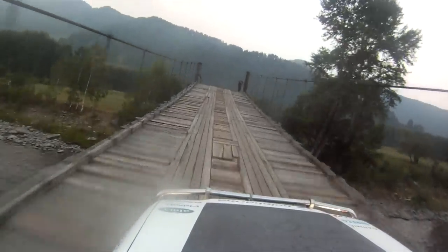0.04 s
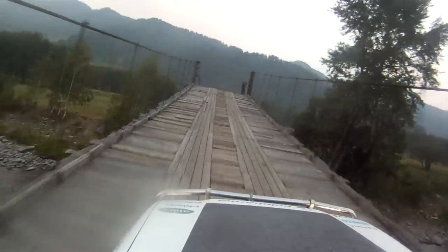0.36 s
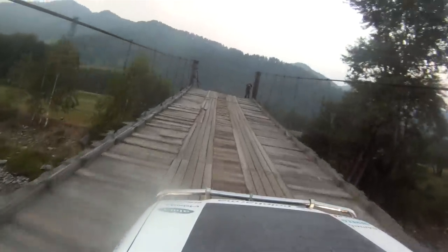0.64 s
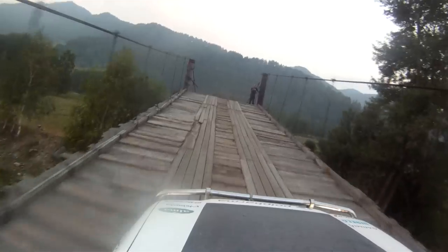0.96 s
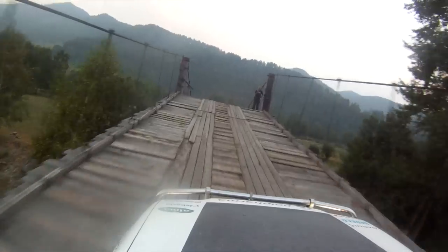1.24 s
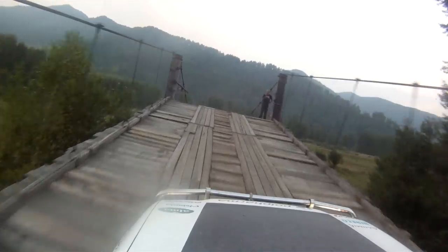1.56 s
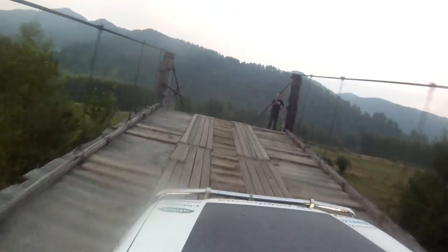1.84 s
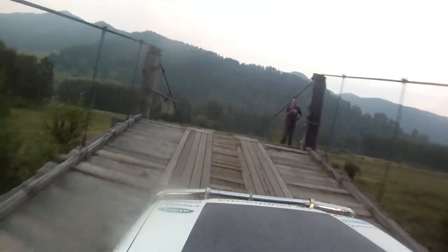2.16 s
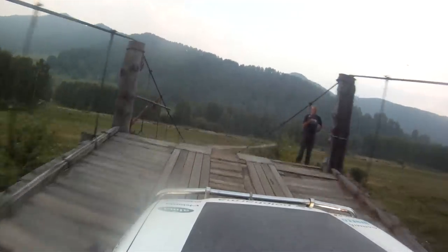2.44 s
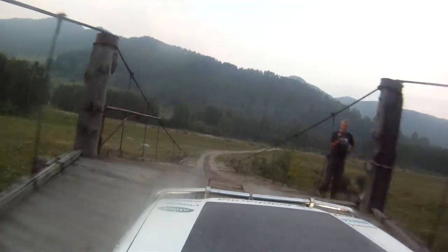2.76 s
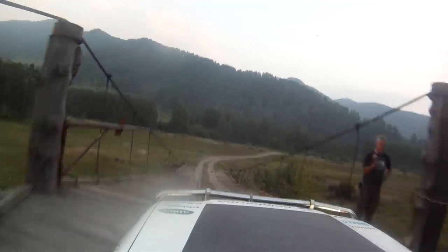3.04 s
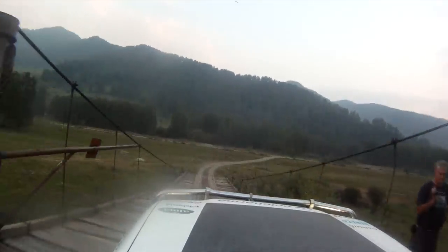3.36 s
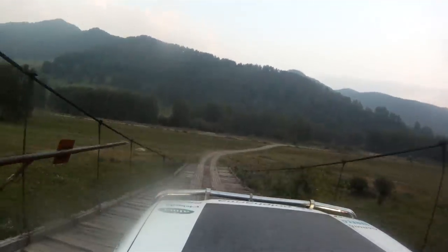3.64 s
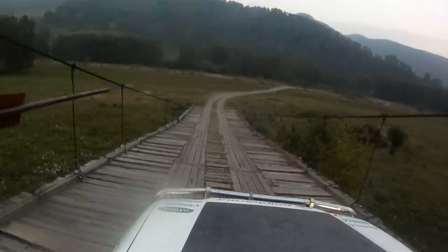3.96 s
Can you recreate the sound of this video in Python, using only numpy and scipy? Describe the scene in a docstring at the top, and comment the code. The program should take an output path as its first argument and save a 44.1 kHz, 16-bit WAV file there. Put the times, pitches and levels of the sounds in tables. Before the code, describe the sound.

A rushing river fades behind a rumbling car, then bridge planks knock and metal rattles.

```python
"""A rushing river fades and dulls while a car booms and rumbles, then planks knock and metal rattles.
An off-road car is rolling over the last planks of a wooden suspension bridge, leaving the water behind.
Its tyres roll on the boards, the uneven deck shakes its body, its engine drones and fittings squeak.
Two thin, sharp clicks come just before the rattles. We listen from a camera in a hard case on a swaying
pole above the roof; the water, tyres, knocks and rattles ring in that case."""
import sys
import numpy as np
from scipy import signal
from scipy.fft import rfft, irfft
from scipy.io import wavfile
from scipy.ndimage import uniform_filter1d

SR = 44100
rng = np.random.default_rng(int(sys.argv[2]) if len(sys.argv) > 2 else 0)


def put_to_file(sound):
    """Save the sound as 16-bit audio at rate SR, in the file named by the first command-line argument."""
    columns = np.atleast_2d(sound).T  # one column per channel
    safe = np.clip(columns, -1, 1)
    whole_steps = np.round(safe * 32767)
    wavfile.write(sys.argv[1], SR, whole_steps.astype(np.int16))


N = 176400
T = np.arange(N) / SR
FREQS = np.maximum(np.arange(N // 2 + 1) * SR / N, 1)
OCTAVES = np.log2(np.maximum(FREQS, 300) / 1000)  # counted from 1 kHz

# the river falling behind: t/s, level/dB, dullness/(dB per octave above 500 Hz)
RIVER_FADE = [(0, -31, 0.5), (.3, -31, -0.5), (.6, -31, 0.3), (.85, -32.5, 0.3), (1.15, -33, -0.05),
              (1.5, -35, 0), (1.85, -37, 0.1), (2.12, -41, 0.55), (2.4, -43.5, 0.5), (2.7, -48.5, 1),
              (3.05, -61.5, -1), (3.45, -64.5, 1.5), (4, -56.5, 1.5)]
# how strongly the car body booms: t/s, level/dB
BOOM_LEVEL = [(0, -26.5), (.1, -24.5), (.25, -29.5), (.45, -27), (.66, -33.5), (.78, -28), (1.1, -29.5),
              (1.38, -31), (1.75, -29), (2.0, -31), (2.35, -36.5), (2.6, -30.5), (2.7, -36.5), (2.8, -26),
              (3.05, -39), (3.25, -28), (3.5, -34), (3.62, -30), (3.82, -38.5), (4, -35)]


def river():
    """Splashes and bubbles make a flickering rush that fades and dulls with distance."""
    # tone colour of the water: f/Hz, level/dB
    water_colour = [(100, -15.5), (300, -5.5), (450, -1.5), (750, -5), (1200, 0.5), (1750, -1.5), (2850, 0),
                    (3300, -2.5), (4250, -14), (6000, -27.5), (7700, -16), (10300, -16), (11500, -36.5),
                    (12600, -33), (15000, -17.5)]
    splash_db, bubble_db, flicker_db = 0.87, -12.5, 0.78
    splashes = unit(rng.standard_normal(N) * undb(splash_db * wander(260)))
    water = unit(splashes + undb(bubble_db) * bubbles())
    spectrum = rfft(in_case(water, water_colour))
    dullness = curve(RIVER_FADE, column=2)
    rush = 0
    for octave in np.arange(-2, 4.5, .5):  # each band flickers on its own
        band = irfft(spectrum * np.maximum(1 - 2 * abs(OCTAVES - octave), 0), N)
        rush += band * undb(flicker_db * wander(11) - dullness * (octave + 1))
    return rush * undb(curve(RIVER_FADE))


def bubbles():
    """Each bubble rings with a short rising ping; higher ones die sooner."""
    per_second, cycles, spread_db = 1500, 16.5, 2.5
    out = np.zeros(N + SR)
    for when, pitch, softness, phase in rng.random((int(per_second * N / SR), 4)):
        hz = 700 * 16 ** pitch
        life = cycles / hz
        t = np.arange(int(2 * life * SR)) / SR
        turns = hz * t * (1 + 0.032 * t / life) + phase
        ping = np.sin(2 * np.pi * turns) * np.exp(-2 * t / life)
        start = int(when * N)
        out[start:start + len(t)] += ping * hz * undb(-spread_db * np.log(max(softness, .01)))
    return unit(out[:N])


def river_whistle():
    """A narrow band of the rush whistles and sinks in pitch as the river slips behind."""
    # path of the whistle: t/s, f/Hz, level/dB relative to the river
    glide = [(.3, 2955, -13.5), (.9, 2724, -28), (1.12, 2662, -7), (1.25, 2500, -8.5), (1.85, 2214, -4),
             (2.3, 2094, -8.5)]
    return wavering_tone(curve(glide), width_hz=170) * undb(curve(glide, column=2) + curve(RIVER_FADE))


def car_body():
    """The uneven deck shakes the body's low notes into a boom; dropping wheels thump them."""
    # notes the body rings at: f/Hz, width/Hz, level/dB
    notes = [(35, 33.6, 2.5), (70, 11.6, 0), (100.9, 20, 0), (118, 19.7, 1.5), (185.3, 19.3, -7),
             (207, 20.5, -11.5), (247, 15, -17.5)]
    # wheel drops: t/s, peak/dB
    drops = [(0.418, -20.5), (0.61, -25.5), (1.708, -20.5), (1.884, -21), (2.748, -21), (2.795, -18.5),
             (3.155, -24), (3.577, -23)]
    power = sum(undb(db) ** 2 / (1 + ((FREQS - hz) / width * 2) ** 2) ** 1.257 for hz, width, db in notes)
    shake = irfft(rfft(rng.standard_normal(N)) * np.sqrt(power), N)
    roughness = undb(1.5 * wander(50))
    boom = unit(even_out(shake, samples=SR // 8) * roughness) * undb(curve(BOOM_LEVEL))
    return boom + ring(drops, notes, swell_s=0.0097)


def planks():
    """Loose planks knock against the deck; a square hit makes one ring."""
    # knocks: t/s, level/dB, rise/s, decay/s, brightness/(dB per octave)
    knocks = [(2.15, -38.5, 0.01, 0.056, -1), (2.463, -28, 0.0049, 0.016, -0.5),
              (2.557, -35.5, 0.0088, 0.012, 0.5), (2.739, -34, 0.0057, 0.024, 0),
              (2.766, -31.5, 0.008, 0.032, 1), (3.162, -40.5, 0.015, 0.037, 0.5),
              (3.202, -32, 0.0061, 0.018, 0.6), (3.259, -39, 0.0018, 0.01, 1),
              (3.304, -34.5, 0.0078, 0.012, 0.5), (3.33, -39, 0.001, 0.015, 0.5),
              (3.374, -46.5, .001, 0.012, 0.5), (3.579, -40, 0.0008, 0.026, 1.5),
              (3.632, -39, 0.0024, 0.013, 1), (3.68, -42.5, 0.0063, 0.033, -0.5),
              (3.816, -44, .001, 0.022, 1), (3.865, -45, 0.012, 0.048, 1)]
    # tone colour of the wood: f/Hz, level/dB
    wood_colour = [(100, -2), (280, 4), (450, 3.5), (750, 0.5), (1200, -9), (1750, -10.5), (2850, -16.5),
                   (3300, -27), (4250, -32), (6000, -48), (7700, -42), (10300, -29), (12500, -22.5),
                   (15000, -47)]
    # notes a plank rings at: f/Hz, width/Hz, boost/dB
    notes = [(993, 250, 8.5), (1603, 230, 4.5)]
    # square hits: t/s, peak/dB
    clacks = [(3.197, -26), (3.303, -40)]
    return grainy_bursts(knocks, wood_colour, notes, grain_db=1.5) + ring(clacks, notes, swell_s=0.0045)


def clicks_and_rattles():
    """Two thin, sharp clicks come first; after them, metal fittings rattle."""
    # two clicks, then the rattles: t/s, level/dB, rise/s, decay/s, brightness/(dB per octave)
    bursts = [(3.27, -41, .0003, .0006, 1), (3.293, -36.5, .0005, 0.00089, 1),
              (3.506, -42, 0.00057, 0.0054, 1.5), (3.5135, -34.5, 0.00055, 0.013, -0.5),
              (3.663, -44.5, 0.001, 0.0092, 0), (3.88, -39, 0.0015, 0.013, 0.5)]
    # their bright tone colour: f/Hz, level/dB
    bright_colour = [(200, -6), (600, -5), (1200, -7), (1750, 0.5), (2700, 0), (3400, -5), (4250, -8),
                     (6000, -26), (7700, -13), (10300, -20), (12000, -37), (15000, -21)]
    # notes they ring at: f/Hz, width/Hz, boost/dB
    notes = [(2120, 51, 10), (3560, 79, 3.5), (8200, 77, 2)]
    return grainy_bursts(bursts, bright_colour, notes, grain_db=4.5)


def tyres():
    """Gritty rolling pulses unevenly from board to board."""
    # tone colour of the deck: f/Hz, level/dB
    deck_colour = [(100, 6.5), (280, -2), (450, -2.5), (750, -7), (1050, 1), (1750, -8), (2850, -20),
                   (4250, -30.5), (6000, -47), (7700, -38.5), (10300, -25), (12500, -23.5), (15000, -44)]
    # loudness of the rolling: t/s, level/dB
    rolling = [(0, -40), (.8, -42.5), (1.5, -41), (2.2, -43), (2.65, -46.5), (2.95, -44.5), (3.1, -51.5),
               (3.33, -48.5), (3.47, -64), (3.65, -55), (3.78, -53), (3.87, -51), (4, -53.5)]
    board_db, grit_db = 3, 0.5
    contact = rng.standard_normal(N) * undb(board_db * wander(26) + grit_db * wander(340))
    return in_case(unit(contact), deck_colour) * undb(curve(rolling))


def pole_sway():
    """The pole wobbles at a very low pitch, a little slower as time goes on."""
    # strength of the wobble: t/s, level/dB
    strength = [(0, -17.5), (.1, -21.5), (.23, -28), (.72, -29.5), (1.05, -21), (1.65, -27), (1.9, -19.5),
                (2.15, -32), (2.45, -22), (2.65, -26.5), (2.92, -20), (3.05, -30), (3.28, -14.5),
                (3.75, -35), (4, -20)]
    start_hz, fall_hz_per_s = 24.29, 0.83
    hz = (start_hz - fall_hz_per_s * T) * (1 + 0.109 * wander(13.5))
    return unit(np.sin(2 * np.pi * np.cumsum(hz) / SR)) * undb(curve(strength))


def engine():
    """The engine's firing makes a rough drone that swells with the boom and sinks as the car slows."""
    # tones of the drone: multiple of the firing rate, level/dB relative to the boom
    tones = [(1, -16), (2, -12), (3, -17.5)]
    firing_hz, fall_hz_per_s, throb_db = 62.87, 1.3, 3.5
    hz = (firing_hz - fall_hz_per_s * T) * (1 + .035 * wander(9.92))
    phase = 2 * np.pi * np.cumsum(hz) / SR
    drone = sum(undb(db) * unit(np.sin(k * phase) * undb(throb_db * wander(11))) for k, db in tones)
    return drone * undb(curve(BOOM_LEVEL))


def squeaks():
    """Metal rubs on metal in brief, fluttering two-tone squeals that sag in pitch."""
    # squeals: t/s, half-length/s, level/dB, low f/Hz, high f/Hz, high tone/dB relative to the low
    squeals = [(2.548, 0.0072, -46, 3690, 8280, -6), (3.693, .017, -62.5, 4880, 7130, -1)]
    sag_per_s, flutter_hz, flutter_db = 0.47, 61.6, 4
    out = 0
    for at, half_length, db, low_hz, high_hz, high_db in squeals:
        age = T - at
        flutter = flutter_db * np.cos(2 * np.pi * flutter_hz * age)
        shape = np.exp(-(age / half_length) ** 2 / 2) * undb(db + flutter)
        bend = 1 - sag_per_s * age + 0.0066 * wander(118)
        phase_per_hz = 2 * np.pi * np.cumsum(bend) / SR
        out += shape * (np.sin(low_hz * phase_per_hz) + undb(high_db) * np.sin(high_hz * phase_per_hz))
    return out


def electronics():
    """The camera's circuits add a faint hiss and a thin, high whine."""
    hiss = undb(-74.5) * rng.standard_normal(N)
    return hiss + undb(-70.5) * wavering_tone(hz=11970, width_hz=120)


def in_case(sound, colour, tilt_db=0, extra_notes=()):
    """Give a sound its tone colour and let it ring in the camera's hard case."""
    # notes the case rings at: f/Hz, width/Hz, boost/dB
    case_notes = [(596, 105, 6), (871, 82, 4), (1062.5, 148, 9), (1354, 154, 5.5), (1540, 330, 3.5),
                  (2006, 163, 8.5), (2267, 268, 10), (2565, 332, 6.5), (3064, 137, 7), (3648, 286, 13.5),
                  (5114, 1080, 9.5), (6840, 770, 8), (8365, 285, 15.5), (8996, 580, 10.5),
                  (9725, 715, 14.5), (10850, 550, 13), (13250, 700, 13.5), (14330, 1180, 16.5)]
    notes = [*case_notes, *extra_notes]
    hz, colour_db = np.array(colour).T
    db = np.interp(np.log(FREQS), np.log(hz), colour_db) + tilt_db * OCTAVES
    db -= 10 * np.log10(1 + (hz[0] / FREQS) ** 4)  # cut the deep bass
    db += sum(boost * .5 ** ((2 * (FREQS - f) / width) ** 2) for f, width, boost in notes)
    # build the filter so that ringing comes after a sound, never before it
    cepstrum = irfft(np.log(unit(undb(db))), N)
    cepstrum[1:N // 2] *= 2
    cepstrum[N // 2 + 1:] = 0
    response = irfft(np.exp(rfft(cepstrum)), N)[:2048]
    return signal.fftconvolve(sound, response)[:N]


def grainy_bursts(bursts, colour, notes, grain_db):
    """Each burst is grainy noise that builds quickly and dies away."""
    grains = rng.standard_normal(N) * undb(grain_db * wander(610))
    grains = even_out(grains, samples=SR // 250)
    out = 0
    for at, db, rise, decay, brightness in bursts:
        shape = np.exp(-np.maximum((at - T) / rise, (T - at) / decay))
        out += undb(db) * in_case(grains * shape, colour, brightness, notes)
    return out


def ring(hits, notes, swell_s):
    """A struck object sounds all its notes at once; they swell, then die away."""
    out = 0
    for at, peak_db in hits:
        age = np.maximum(T - at, 0)
        chord = sum(undb(db) * np.sin(2 * np.pi * hz * age) for hz, _, db in notes)
        tone = chord * age * np.exp(-age / swell_s)
        out += undb(peak_db) * tone / abs(tone).max()
    return out


def wavering_tone(hz, width_hz):
    """A narrow band of noise around a steady or moving pitch."""
    phase = 2 * np.pi * np.cumsum(hz * np.ones(N)) / SR
    return wander(width_hz) * np.cos(phase) + wander(width_hz) * np.sin(phase)


def wander(rate_hz):
    """A smooth random wiggle with a typical size of 1."""
    return unit(irfft(rfft(rng.standard_normal(N)) * np.exp(-(FREQS / rate_hz) ** 2), N))


def curve(rows, column=1):
    """One column of a table, joined by straight lines in time."""
    rows = np.array(rows)
    return np.interp(T, rows[:, 0], rows[:, column])


def even_out(sound, samples):
    """Hold the level near 1 over every stretch of this many samples."""
    return sound / np.sqrt(uniform_filter1d(sound ** 2, size=samples))


def unit(x):
    """Scale to an average level (rms) of 1."""
    return x / np.sqrt(np.mean(x ** 2))


def undb(db):
    """Turn decibels into a volume factor."""
    return 10 ** (np.asarray(db) / 20)


def scene():
    """Bridge, river and car add up at one microphone."""
    short_sounds = planks() + clicks_and_rattles() + squeaks()
    water = river() + river_whistle()
    car = tyres() + engine() + car_body()
    return (short_sounds + water + car + pole_sway() + electronics())[None]


def record(dry):
    """The camera cuts off the highest treble."""
    top_hz = 15200
    return signal.sosfilt(signal.ellip(12, .2, 80, top_hz, fs=SR, output="sos"), dry)


dry = scene()
out = record(dry)
put_to_file(out)
```